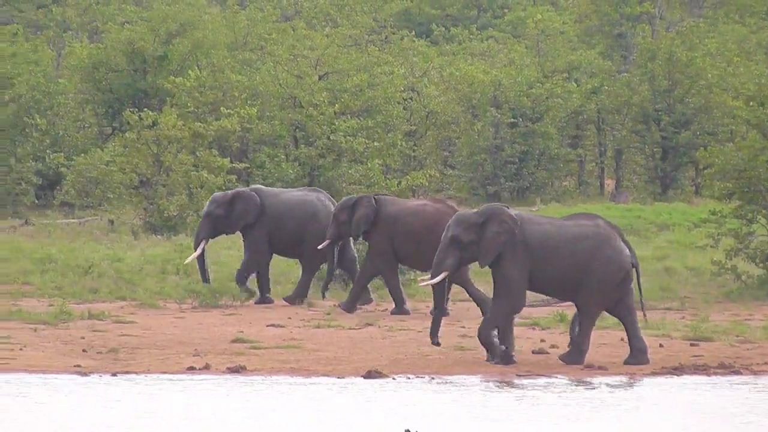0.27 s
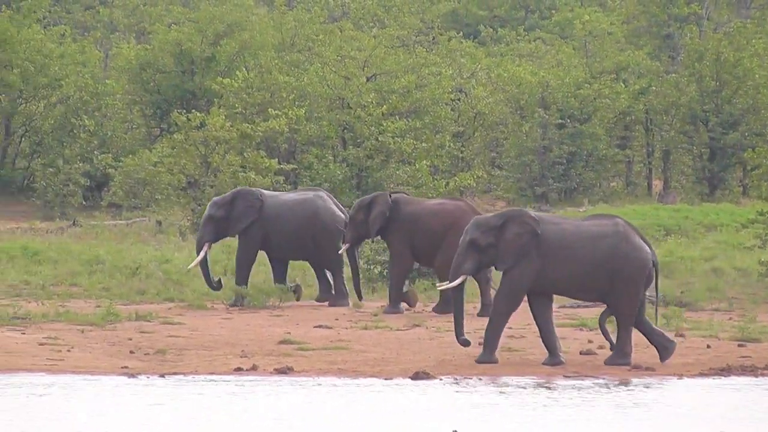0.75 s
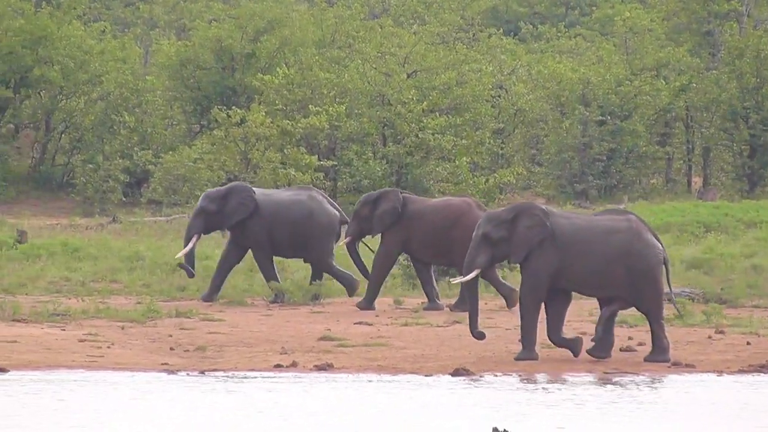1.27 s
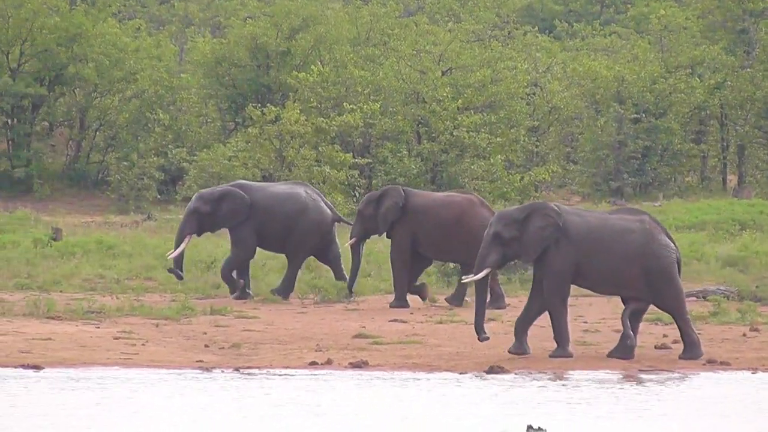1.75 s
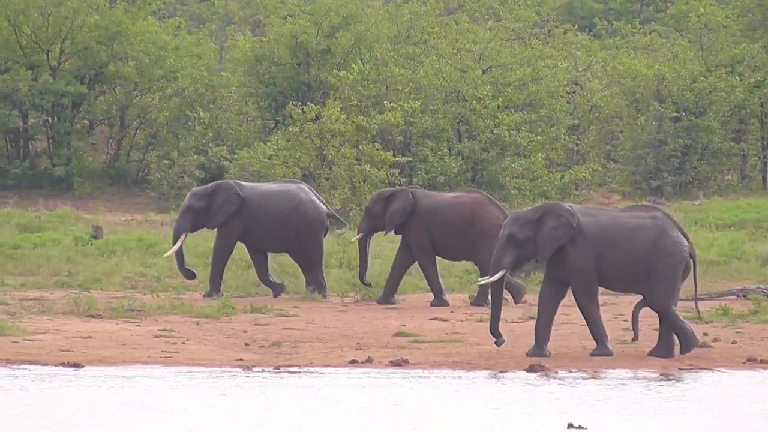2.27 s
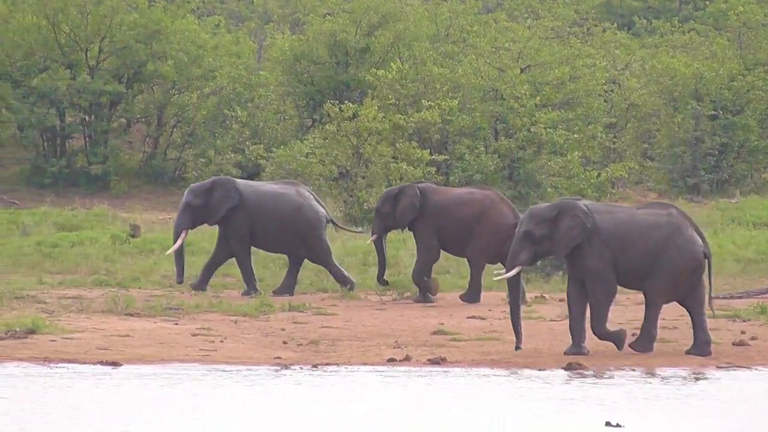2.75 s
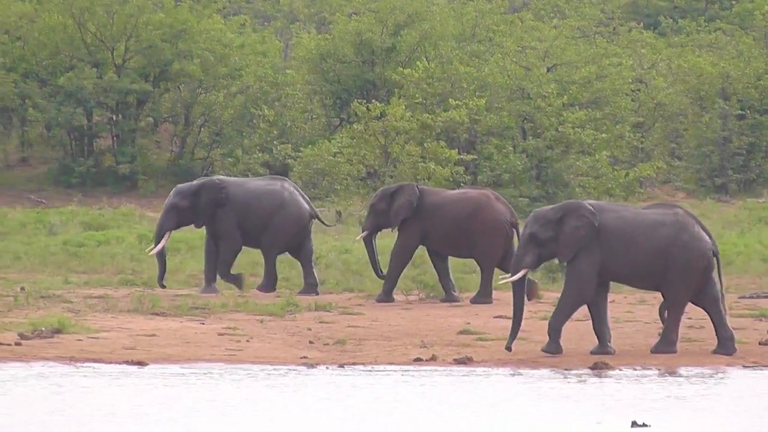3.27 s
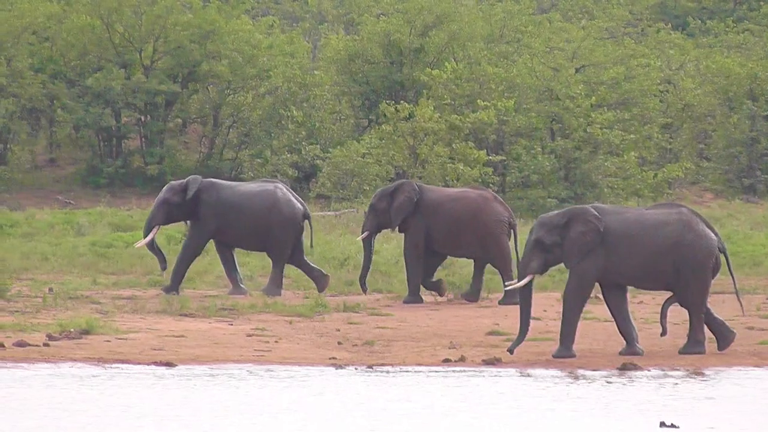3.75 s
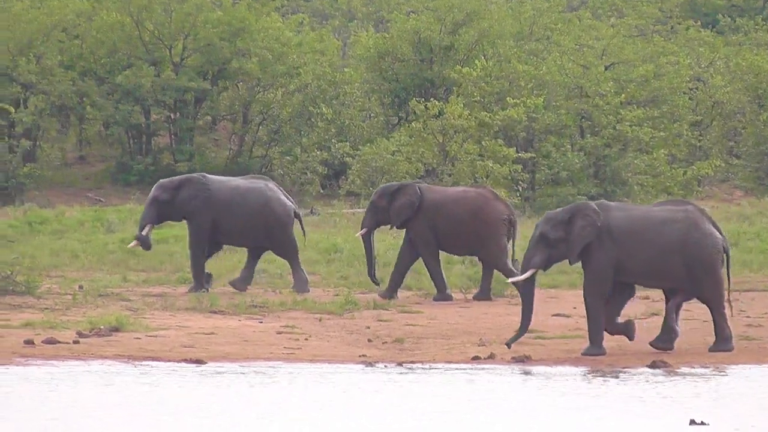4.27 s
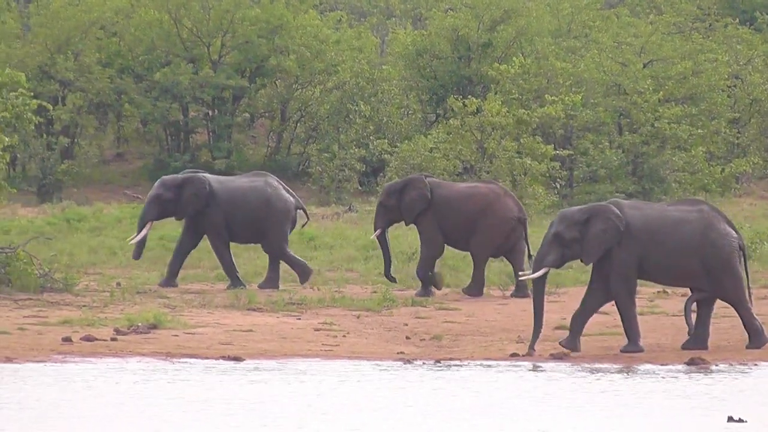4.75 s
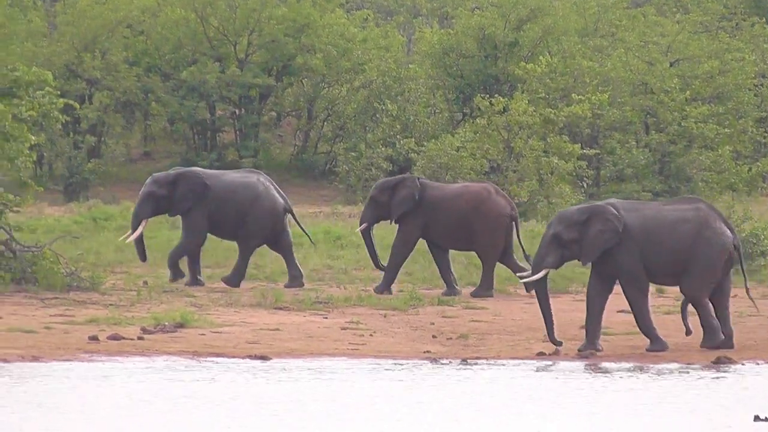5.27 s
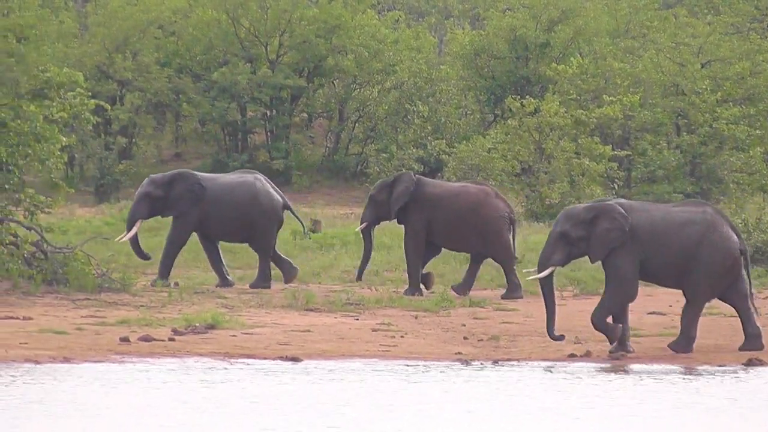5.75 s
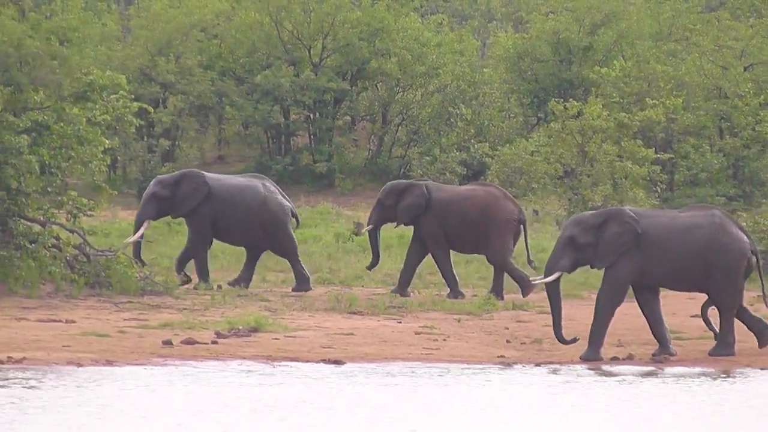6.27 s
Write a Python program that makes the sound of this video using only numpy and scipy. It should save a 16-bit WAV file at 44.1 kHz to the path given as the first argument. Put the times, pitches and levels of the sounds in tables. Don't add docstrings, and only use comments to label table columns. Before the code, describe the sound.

Continuous sloshing and churning water, busiest at the start, with quick hollow slaps, deep plops and scattered drops. A single violent crack strikes the microphone's housing midway and dies almost at once. The wading carries on more sparsely, joined by faint bird chirps, a short whistle and a regular, thin cricket, then splashes more fully near the end with pattering spray. Open air, low rumble, light hiss.

```python
import sys
import numpy as np
from scipy import signal
from scipy.fft import rfft, irfft
from scipy.io import wavfile
from scipy.ndimage import uniform_filter1d

SR = 44100
rng = np.random.default_rng(int(sys.argv[2]) if len(sys.argv) > 2 else 0)


def gain_from_db(level_db):
    decades = np.asarray(level_db, float) / 20
    return 10 ** decades


def generate_wav(signal):
    frames = np.transpose(np.atleast_2d(signal))
    scaled = np.clip(frames, -1, 1) * 32767
    pcm = np.round(scaled).astype(np.int16)
    wavfile.write(sys.argv[1], SR, pcm)


N = 287091
T = np.arange(N) / SR

# start in seconds, peak in dB, cavity pitch in Hz, sharpness in dB.
LEG_SLAPS = [(0.05, -18, 750, -20), (0.575, -25, 720, -16), (0.214, -24.5, 666, -16),
             (0.245, -22, 690, -18), (0.332, -20.5, 754, -14), (0.478, -24.5, 727, -35),
             (0.825, -24.5, 760, -15), (1.052, -24.5, 663, -20), (1.088, -25.5, 697, -12),
             (1.398, -29, 820, -19), (1.225, -24.5, 760, -14), (1.528, -26, 670, -19),
             (5.675, -25, 740, -16), (1.874, -32, 660, -5), (2.163, -23.5, 686, -23),
             (2.214, -22.5, 690, -22), (2.247, -25, 683, -14), (0.77, -27, 714, -16), (4.18, -30, 784, -12),
             (3.011, -25, 675, -10), (3.375, -24, 696, -10), (3.609, -34, 760, 2), (3.899, -28, 646, -8),
             (4.5, -30, 876, -14), (5.022, -21, 670, 2.5), (5.424, -23, 703, -14), (5.592, -24.5, 813, -11),
             (5.708, -31, 684, -14), (5.825, -30, 797, -9), (6.069, -29, 840, -8)]
# start in seconds, peak in dB, cavity pitch in Hz, t60 in seconds.
FOOT_PLUNGES = [(0.051, -23.5, 231, 0.07), (0.354, -29, 258, 0.04), (0.465, -33, 254, 0.07),
                (0.576, -29, 255, 0.052), (0.754, -32, 205, 0.15), (1.018, -31.5, 244, 0.14),
                (1.44, -33, 226, 0.056), (2.43, -29, 236, 0.047), (3.292, -37, 218, 0.07),
                (4.491, -35, 245, 0.04), (4.937, -35, 250, 0.07), (5.38, -28.5, 238, 0.1),
                (5.599, -33, 250, 0.078)]


def colour(x, points):
    hz, db = np.transpose(points)
    grid = np.maximum(np.arange(2049) * SR / 4096, 1)
    log_gain = np.log(gain_from_db(np.interp(np.log(grid), np.log(hz), db)))
    cepstrum = irfft(log_gain)
    cepstrum[1:2048] *= 2
    cepstrum[2049:] = 0
    impulse = irfft(np.exp(rfft(cepstrum)))
    return signal.fftconvolve(x, impulse)[:len(x)]


def unit(x):
    return x / np.sqrt(np.mean(x ** 2))


def walk(rate):
    hold = max(int(SR / rate), 2)
    steps = np.repeat(rng.standard_normal(2000), hold)[:N]
    return unit(uniform_filter1d(uniform_filter1d(steps, hold), hold))


def add(out, s, sound):
    i = int(s * SR)
    out[i:i + len(sound)] += sound[:N - i]


def ring(hz, t60, rise, glide=0., phase=0.):
    t = np.arange(int(t60 * SR) + 50) / SR
    body = (1 - np.exp(-t / rise)) * np.exp(-np.log(1000) * t / t60)
    return body / body.max() * np.sin(2 * np.pi * hz * t * (1 + glide * t / t60) + phase)


def water(points, count, spread_db, tail_s, wash_db, flicker_db, flicker_rate):
    when = rng.random(count)
    size = gain_from_db(spread_db * np.minimum(rng.exponential(size=count), 3))
    hits = np.bincount((when * N).astype(int), size ** 2, N)
    power = signal.lfilter([1], [1, -np.exp(-1 / (tail_s * SR))], hits)
    shape = np.sqrt(power / power.mean() + gain_from_db(2 * wash_db))
    shape = shape * gain_from_db(flicker_db * walk(flicker_rate))
    return unit(colour(shape * rng.standard_normal(N), points))


def bubbles(count, low_hz, octaves, cycles, spread_db):
    out = np.zeros(N)
    for when, pitch, size in rng.random((count, 3)):
        hz = low_hz * 2 ** (octaves * pitch)
        bubble = ring(hz, cycles / hz, 2 / hz, glide=0.086)
        add(out, when * N / SR, gain_from_db(spread_db * size) * bubble)
    return unit(out)


def waves(events, lead, rise, fall, gain_db):
    out = np.ones(N)
    t = np.arange(SR) / SR
    surge = (1 - np.exp(-t / rise)) * np.exp(-t / fall)
    for s, db, *_ in events:
        add(out, max(s - lead, 0), gain_from_db(2 * (db + gain_db)) * surge)
    return np.sqrt(out)


def wading():
    # time in seconds, effort in dB, throw (water flung into the air) in dB.
    strides = [(0.0, -44, -59), (1.03, -45.5, -57.5), (1.38, -45.5, -58.5), (1.68, -46.5, -59),
               (2.03, -48, -61.5), (2.23, -45, -62), (2.43, -43.5, -57.5), (2.65, -45.5, -58),
               (3.1, -47.5, -60), (3.57, -46, -58), (3.7, -46.5, -60), (4.21, -50, -62.5),
               (4.5, -46, -60.5), (5.08, -46.5, -60.5), (5.62, -43.5, -57), (5.84, -47.5, -57),
               (6.2, -51, -59.5), (6.51, -47.5, -61.5)]
    # frequency in Hz, level in dB per Hz.
    churn_colour = [(220, -45.5), (380, -21.5), (475, -13), (567, -8.5), (678, 0), (778, -0.5), (915, -9.5),
                    (996, -10), (1080, -16), (1240, -8.5), (1660, -15.5), (1880, -8.5), (2400, -28),
                    (3120, -74), (5280, -120)]
    slosh_colour = [(65, -44), (110, -15), (247, 0), (355, -12), (400, -22.5), (520, -29), (880, -120)]
    spray_colour = [(1350, -25), (2300, -25), (2450, -5), (2890, 1.5), (3190, -4.5), (3590, -8), (4090, -6),
                    (4500, -11), (5850, -39), (9900, -120)]
    mist_colour = [(3800, -39), (4500, -9.5), (4850, 0), (5250, -1), (5700, 0), (6100, -5), (6700, -5),
                   (7300, -12), (7700, -19), (9000, -42)]

    s, effort, throw = np.transpose(strides)
    effort = np.interp(T, s, effort) + 46.5
    throw = np.interp(T, s, throw) + 59

    churn = water(churn_colour, count=900, spread_db=3.0, tail_s=0.0059, wash_db=4.0,
                  flicker_db=1.0, flicker_rate=14.)
    slosh = water(slosh_colour, count=250, spread_db=3., tail_s=.012, wash_db=0.5,
                  flicker_db=0.6, flicker_rate=9.)
    spray = water(spray_colour, count=1500, spread_db=3.0, tail_s=0.0022, wash_db=4.0,
                  flicker_db=1.0, flicker_rate=18.)
    mist = water(mist_colour, count=2500, spread_db=3.0, tail_s=.002, wash_db=5.0,
                 flicker_db=1.35, flicker_rate=18.)

    gurgle = bubbles(count=700, low_hz=495.6, octaves=2.163, cycles=23.6, spread_db=14.5)
    blips = bubbles(count=400, low_hz=2400., octaves=.9, cycles=60., spread_db=8.)
    tinkle = bubbles(count=300, low_hz=4580.0, octaves=0.605, cycles=110.0, spread_db=7.0)
    churn += gain_from_db(-9.0) * unit(colour(gurgle, churn_colour))
    spray += gain_from_db(-14) * unit(colour(blips, spray_colour))
    mist += gain_from_db(-10.5) * unit(colour(tinkle, mist_colour))

    wave = waves(FOOT_PLUNGES, lead=0, rise=.04, fall=0.13, gain_db=29)
    wake = waves(LEG_SLAPS, lead=0.019, rise=0.018, fall=0.043, gain_db=23.5)
    out = gain_from_db(-44.5 + effort) * wake * churn
    out += gain_from_db(-53 + 0.87 * effort) * wave * slosh
    out += gain_from_db(-62.5 + 0.24 * effort + 0.93 * throw) * wake * spray
    return out + gain_from_db(-62 + 0.89 * throw) * mist


def slaps():
    out = np.zeros(N)
    t60 = 0.039
    for s, db, hz, sharp_db in LEG_SLAPS:
        add(out, s, gain_from_db(db - 7) * ring(hz, t60, 0.00097, glide=0.088))
        add(out, s, gain_from_db(db + sharp_db - 16.5) * ring(2.86 * hz, 0.34 * t60, .001))
        add(out, s, gain_from_db(db + sharp_db - 7.0) * ring(1.886 * hz, 0.5 * t60, 0.0011))
    return out


def plunges():
    out = np.zeros(N)
    for s, db, hz, t60 in FOOT_PLUNGES:
        add(out, s, gain_from_db(db - 7.5) * ring(hz, t60, 0.0073, glide=0.018))
    return out


def drops():
    # start in seconds, peak in dB, centre in Hz, nearness as top octave level in dB.
    flung = [(0.1715, -38, 5080, -11), (0.9263, -36, 5120, -11), (1.1273, -41, 5430, -14),
             (1.5494, -50, 4200, -3), (1.5963, -38, 5160, -9), (1.9086, -37, 4610, -12),
             (2.4772, -29, 5630, 0), (2.5561, -34, 5760, -10), (3.038, -37.5, 5110, -11),
             (5.023, -42, 5280, -11), (5.5288, -38, 3040, -9), (5.612, -35, 4810, -17),
             (5.8227, -37, 3060, -8), (5.8873, -38, 5530, -17), (5.9104, -38, 5500, -16),
             (5.9546, -36, 4760, -18), (6.418, -40.5, 5210, -10)]
    out = np.zeros(N)
    t = np.arange(2000) / SR
    decay = np.exp(-np.log(1000) * t / 0.02)
    for s, db, hz, top_db in flung:
        points = [(.4 * hz, -24), (.8 * hz, -9), (hz, 0), (1.2 * hz, -8),
                  (7700, -22), (9000, top_db - 8), (15000, top_db - 12)]
        tick = colour(rng.standard_normal(len(t)) * decay, points)
        add(out, s, gain_from_db(db - 5.5) * tick / np.abs(tick).max())
    return out


def showers():
    # start in seconds, length in seconds, level in dB, centre in Hz.
    sheets = [
        (5.878, 0.061, -50, 5700),
        (5.945, 0.035, -53, 5100),
        (6.025, 0.055, -57, 6000),
        (6.07, 0.064, -59, 6300),
        (2.33, 0.034, -58, 3900),
        (4, 0.031, -67, 2600),
        (4.116, 0.0086, -59, 3300),
        (1.9, .025, -57, 3600),
    ]
    out = np.zeros(N)
    for s, length, db, hz in sheets:
        chance = rng.standard_normal((2, int(length * SR)))
        grain = uniform_filter1d(gain_from_db(7.5 * np.clip(chance[0], -2, 2)), size=40)
        grain = grain * np.sqrt(np.hanning(chance.shape[1]))
        points = [(.35 * hz, -25), (.55 * hz, -4), (.75 * hz, -14), (hz, 0), (1.12 * hz, -11),
                  (7000, -10), (7800, -20), (9000, -30)]
        add(out, s, gain_from_db(db) * unit(colour(grain * chance[1], points)))
    return out


def knock():
    # pitch in Hz, level in dB, t60 in seconds, build-up in seconds.
    modes = [(180, -11.5, 0.062, 0.0025), (205, -34, 0.27, 0.018), (250, -31, 0.11, 0.011),
             (316, -29, 0.096, 0.0064), (380, -24, 0.07, 0.0019), (545, -32, 0.038, .002),
             (640, -13, 0.02, 0.0016), (970, -20.5, 0.047, .002), (1083, -6.5, 0.017, 0.0021),
             (1310, -9, 0.017, 0.0015), (1627, -6, 0.016, 0.00087), (1850, -41, 0.17, 0.0076),
             (2230, -12, 0.016, 0.0011), (2760, -19, 0.012, 0.00072), (5105, -12.5, 0.01, .002),
             (5850, -22.5, 0.016, 0.0022), (6730, -17.5, 0.01, .001), (8650, -51, 0.14, .003),
             (8920, -7.5, 0.011, 0.00069), (9740, -0.5, 0.0036, 0.00034), (11870, -4, 0.0064, 0.0017)]
    # frequency in Hz, level in dB.
    crack_colour = [(60, -40), (400, -23), (2000, -13), (3500, -12), (5000, -2.5), (7400, -11.5),
                    (9500, -3), (13000, 4), (16000, -10)]
    blow_s, thump_lead_s = 2.8278, 0.0011
    out = np.zeros(N)
    add(out, blow_s - .0025, gain_from_db(-34) * ring(584, 0.024, .001))
    for hz, db, t60, rise in modes:
        lead = thump_lead_s if hz < 400 else 0
        add(out, blow_s - lead, gain_from_db(db) * ring(hz, t60, rise))
    add(out, blow_s - thump_lead_s, gain_from_db(-25.5) * ring(97.0, .09, .004))

    t = np.arange(8000) / SR
    chance = rng.standard_normal((2, len(t)))
    burst = (1 - np.exp(-t / .0006)) * (np.exp(-t / .0017) + gain_from_db(-45) * np.exp(-t / .011))
    add(out, blow_s, gain_from_db(6.5) * colour(burst * chance[0], crack_colour))
    rattle = colour(np.exp(-t / 0.043) * chance[1],
                    [(60, -30), (150, -4), (450, -5), (1000, -10), (3000, -53)])
    add(out, blow_s, gain_from_db(-21) * rattle)
    return colour(out, [(40, -31), (130, -1.0)])


def birds():
    # start in seconds, length in seconds, top of strongest partial in Hz, level and upper partial in dB.
    chirps = [
        (3.292, .016, 5100, -63, 2),
        (3.302, 0.04, 5650, -52, -13),
        (3.51, 0.019, 5400, -59, -15),
        (3.906, 0.024, 5760, -46, -18),
        (3.925, 0.009, 5600, -48, -20),
        (4.351, 0.037, 5860, -56.5, -14),
        (4.388, .01, 5570, -55, -12),
        (4.793, .042, 5850, -62, -12),
    ]
    # start in seconds, length in seconds, first pitch in Hz, level in dB.
    peeps = [
        (2.731, .02, 3320, -58),
        (6.372, .018, 4130, -63),
        (6.398, .02, 4270, -64),
    ]
    # time in seconds, pitch in Hz, level in dB.
    whistle = [
        (4.752, 2810, -75),
        (4.762, 2860, -56),
        (4.782, 2890, -53),
        (4.808, 2900, -57),
        (4.83, 2920, -58),
        (4.845, 2920, -87),
    ]
    out = np.zeros(N)
    for s, length, hz, db, upper_db in chirps:
        u = np.linspace(0, 1, int(length * SR))
        arch = hz / 3 * (1 - .34 * (u - .45) ** 2)
        phase = 2 * np.pi * np.cumsum(arch) / SR
        tone = gain_from_db(-8) * np.sin(phase) + gain_from_db(-16) * np.sin(2 * phase)
        tone += np.sin(3 * phase) + gain_from_db(upper_db) * np.sin(4 * phase)
        add(out, s, np.sqrt(2) * np.hanning(len(u)) ** 0.24 * gain_from_db(db) * tone)

    for s, length, hz, db in peeps:
        t = np.arange(int(length * SR)) / SR
        tone = np.sin(2 * np.pi * (hz + 8000 * t / 2) * t)
        add(out, s, np.sqrt(2) * gain_from_db(db) * np.sqrt(np.hanning(len(t))) * tone)

    s, hz, db = np.transpose(whistle)
    gain = np.sqrt(2) * gain_from_db(np.interp(T, s, db, left=-150, right=-150))
    out += gain * np.sin(2 * np.pi * np.cumsum(np.interp(T, s, hz)) / SR)

    trees = rng.standard_normal(6000) * np.exp(-np.arange(6000) / (0.054 * SR))
    blur = signal.fftconvolve(out, trees / np.linalg.norm(trees))[:N]
    return out + gain_from_db(-8) * blur


def cricket():
    # time in seconds, level in dB.
    marks = [
        (3.703, -63),
        (3.903, -52),
        (4.103, -56),
        (4.826, -54),
        (5.624, -53),
        (6.131, -52),
        (6.433, -58),
    ]
    out = np.zeros(N)
    mark_s, mark_db = np.transpose(marks)
    period_s = .101
    beat = np.r_[0, np.cumsum(np.round(np.diff(mark_s) / period_s))]
    every = np.arange(beat[-1] + 1)
    t = np.arange(int(0.017 * SR)) / SR
    swell = np.hanning(len(t)) ** 0.66
    for s, db in zip(np.interp(every, beat, mark_s), np.interp(every, beat, mark_db)):
        loud, pitch = rng.standard_normal(2)
        db = db + 1 + 1. * loud
        hz = 8350 + 12 * pitch
        add(out, s - .0185, gain_from_db(db - 5) * swell * np.sin(2 * np.pi * (hz - 90) * t))
        add(out, s - .0012, gain_from_db(db) * swell * np.sin(2 * np.pi * hz * t))
    return out


def rumble():
    # frequency in Hz, level in dB per Hz.
    rumble_colour = [(13, -48), (22, -18), (75, -11), (120, -5.5), (160, -42), (260, -120)]
    # peak time in seconds, lift in dB, half width in seconds.
    swells = [
        (0, 1, .2),
        (5.2, 6, 0.18),
        (5.83, 5, .09),
    ]
    level = -72 + sum(db * np.exp(-.5 * ((T - s) / width) ** 2) for s, db, width in swells)
    return gain_from_db(level) * unit(colour(rng.standard_normal(N), rumble_colour))


def hiss():
    # frequency in Hz, level in dB per Hz.
    hiss_colour = [(4470, -49), (7600, -26.5), (7880, -15), (8670, -1), (9100, 0.5), (11400, 2), (12000, 0),
                   (15000, -2.5), (15800, -5.5)]
    return gain_from_db(-53) * unit(colour(rng.standard_normal(N), hiss_colour))


def scene():
    # frequency in Hz, side minus mid in dB.
    port_difference = [(25, -17), (60, -2.5), (200, -26), (420, -6), (750, -35), (1000, -14), (1400, -32.5),
                       (5500, -27), (6800, -17), (9000, -31.5), (16000, -41)]
    far = wading() + slaps() + plunges() + drops() + showers()
    far += birds() + cricket() + rumble() + hiss()
    blow = knock()
    scatter = rng.standard_normal(600) * np.exp(-np.arange(600) / 150.)
    uneven = far + gain_from_db(6) * blow
    scattered = signal.fftconvolve(uneven, scatter / np.linalg.norm(scatter))[:N]
    side = colour(scattered, port_difference)
    return np.array([far + blow + side, far + blow - side])


def band_limit(x):
    return signal.sosfilt(signal.butter(12, 15910, fs=SR, output="sos"), x)


def record(dry):
    clipped = np.clip(dry, -.95, .95)
    top_cut = signal.ellip(8, .2, 70, 15800, fs=SR, output="sos")
    return band_limit(signal.sosfilt(top_cut, clipped))


dry = scene()
out = record(dry)
generate_wav(out)
```